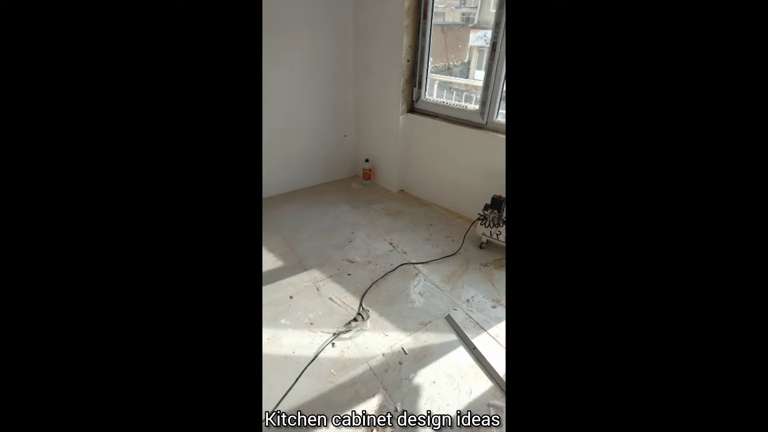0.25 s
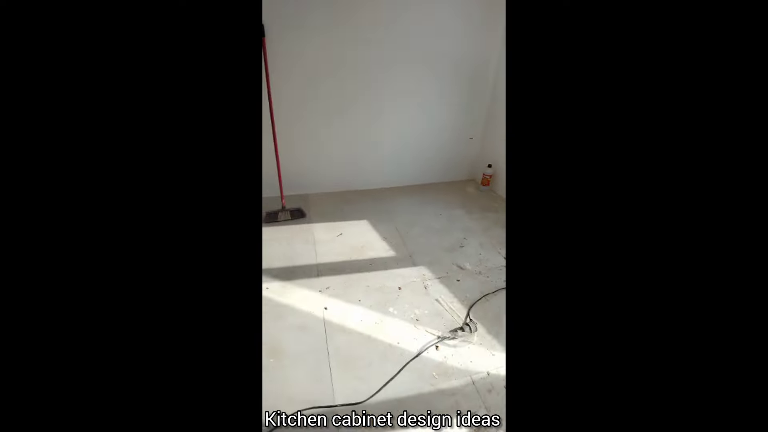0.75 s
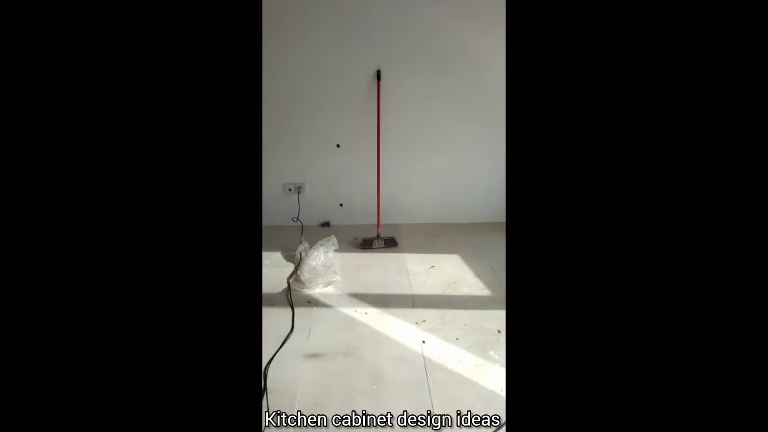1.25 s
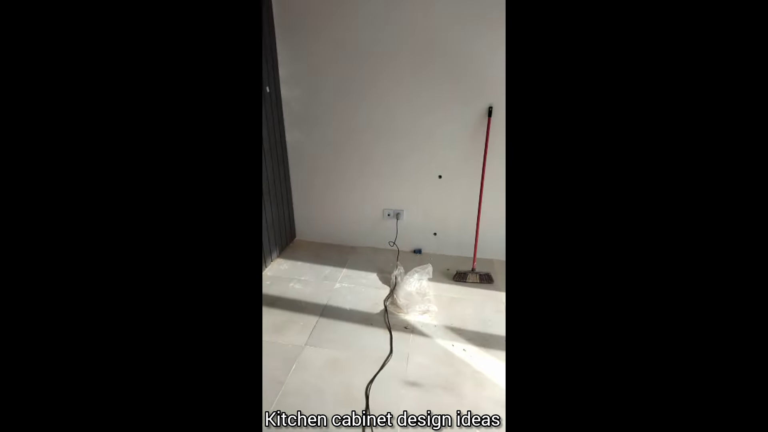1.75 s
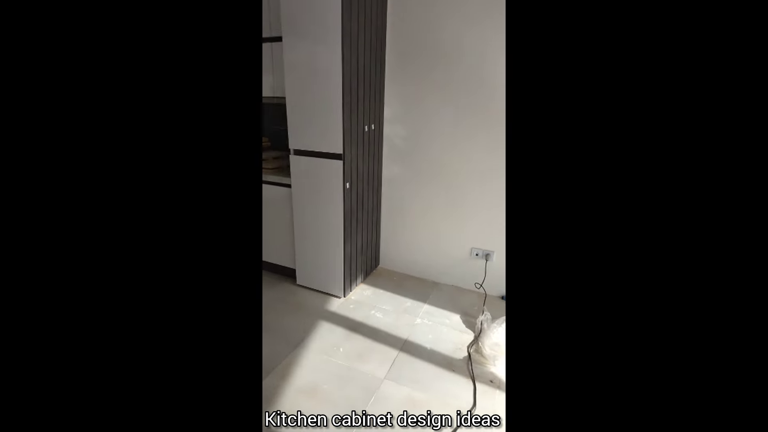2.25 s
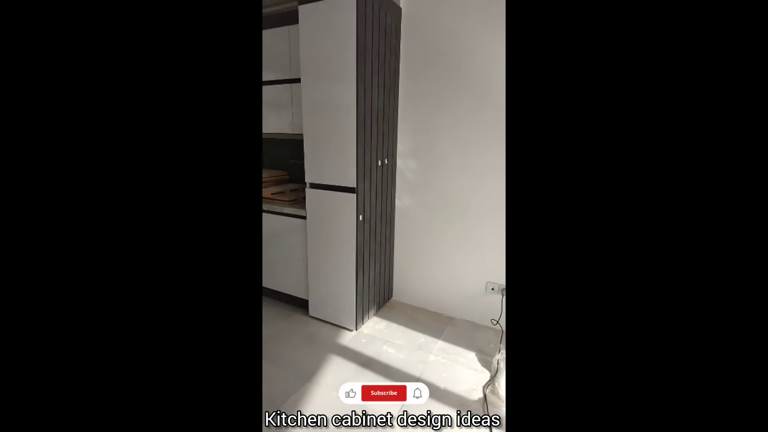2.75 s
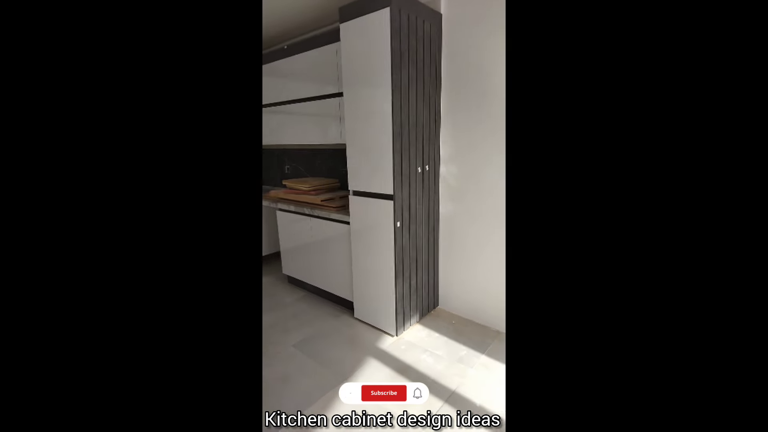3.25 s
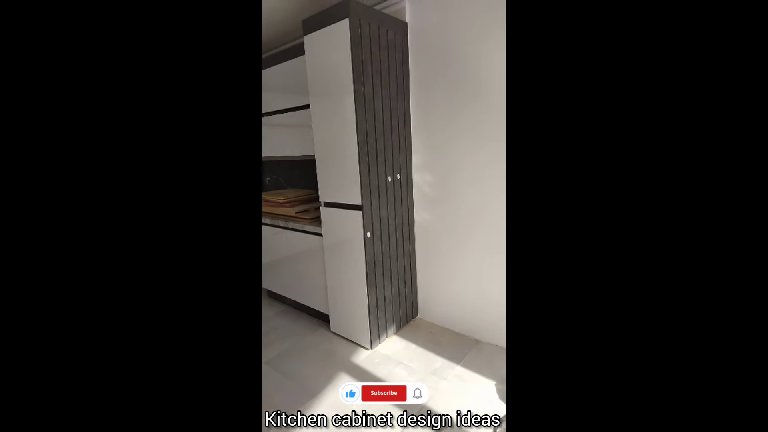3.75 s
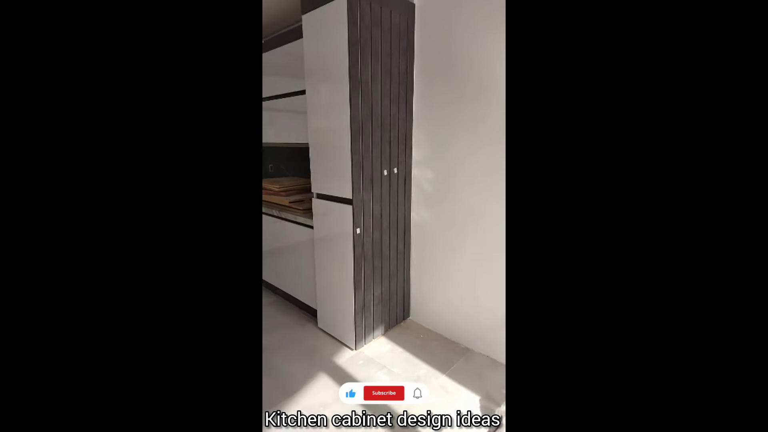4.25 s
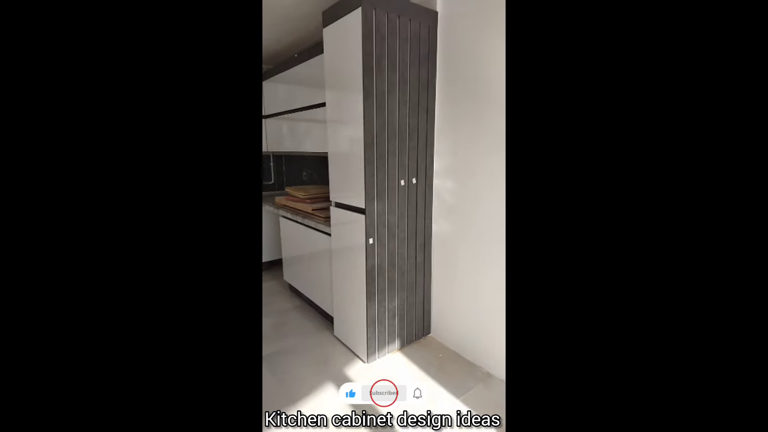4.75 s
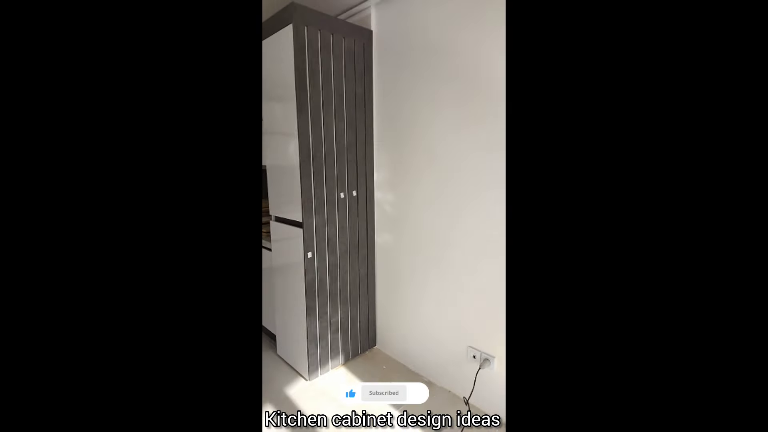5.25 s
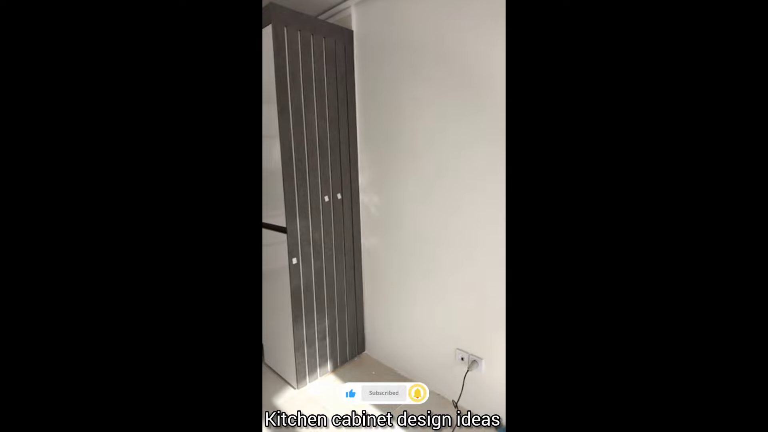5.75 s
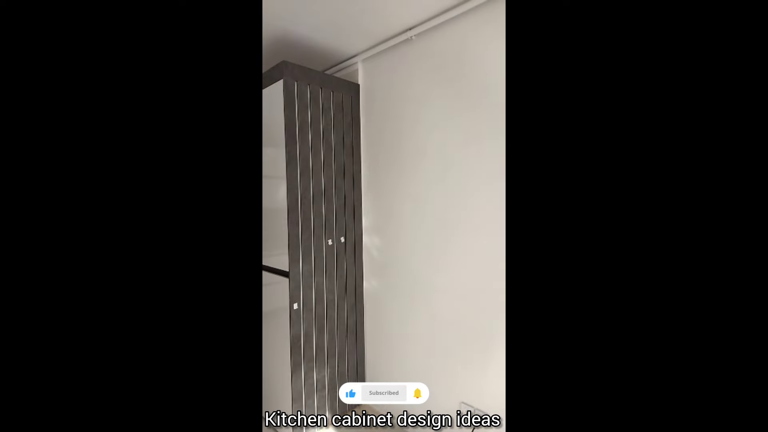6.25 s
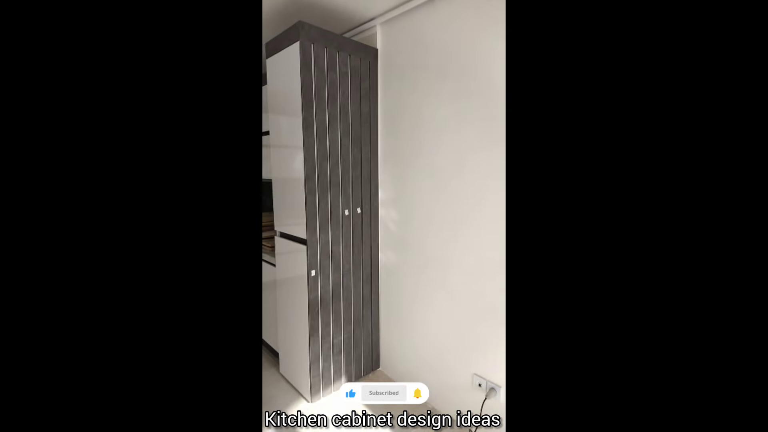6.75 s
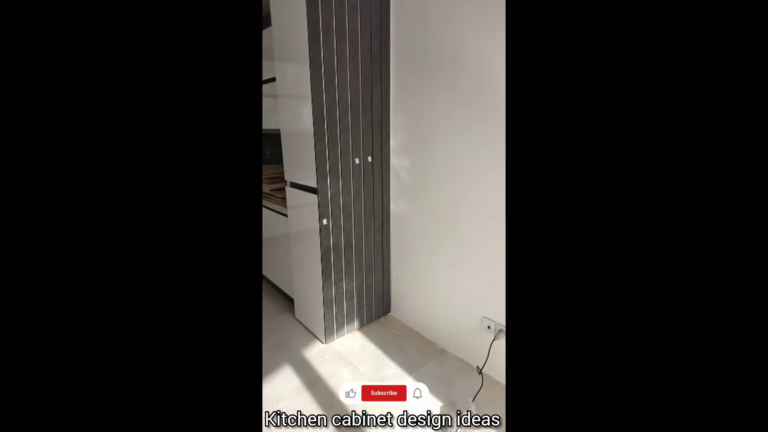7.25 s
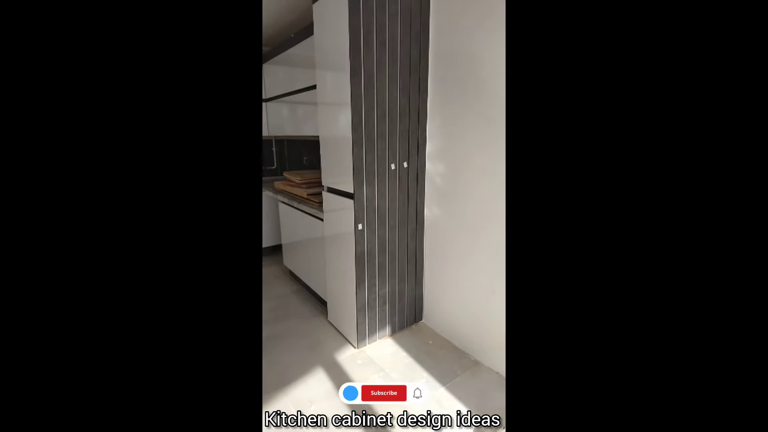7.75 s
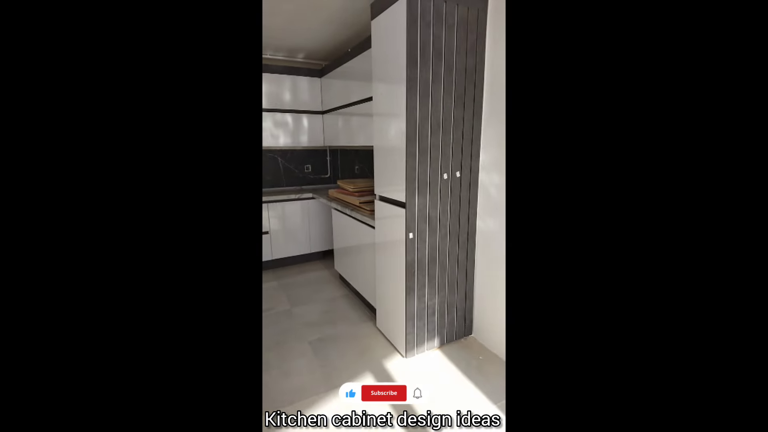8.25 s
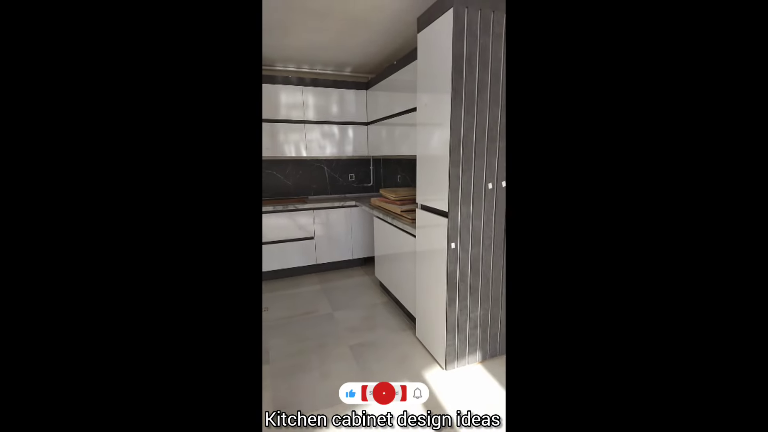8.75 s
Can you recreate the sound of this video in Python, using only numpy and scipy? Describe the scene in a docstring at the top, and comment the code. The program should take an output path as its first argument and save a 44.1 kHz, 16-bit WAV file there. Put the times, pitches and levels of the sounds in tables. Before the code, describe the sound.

An air blow gun spits rapid bursts, pauses, then spits again more softly, over a low buzzing compressor in a hard-walled empty room.

```python
"""Short blasts of a blow gun sweep dust in a bare tiled room: turbulent noise, shaped in frequency,
hisses at the nozzle and sounds duller where the jet strikes; decaying noise gives the room's answer.
A small twin-piston air compressor hums behind it: sine tones at multiples of its shaft speed, and noise
that pulses with the strokes. The phone turns and walks away from the pump, so the hum's tones
swell and fade in the room's standing waves."""
import sys
import numpy as np
from scipy import signal
from scipy.fft import rfft, irfft, next_fast_len
from scipy.io import wavfile
from scipy.ndimage import uniform_filter1d, map_coordinates

SR = 44100
rng = np.random.default_rng(int(sys.argv[2]) if len(sys.argv) > 2 else 0)


def dump(signal):
    """Clip the signal to [-1, 1] and save it as 16-bit WAV at the path in sys.argv[1]."""
    limited = np.clip(np.atleast_2d(signal).T, -1, 1)
    pcm = np.round(limited * 32767).astype(np.int16)
    wavfile.write(sys.argv[1], SR, pcm)


N = 397341
t = np.arange(N) / SR  # seconds


def blow_gun():
    """Jet turbulence: broadband noise, bright from the nozzle and duller where the jet strikes."""
    # Spectra of the nozzle hiss, the spray off the floor, the roar in corners and the low rush.
    # Each row: frequency in Hz, relative spectral density in dB per Hz.
    hiss_spectrum = [(3000, -24), (5500, -8.5), (7200, -7), (9000, -2), (11000, -6), (12000, -0.5),
                     (14000, -1), (15700, 1)]
    spray_spectrum = [(1300, -39.5), (2300, -3), (3500, 1), (4800, -1.5), (6300, -5), (9000, -15)]
    roar_spectrum = [(600, -26.5), (1100, -1), (1600, 0.5), (2200, 0.5), (3600, -15)]
    low_spectrum = [(120, -34), (300, -0.5), (600, -0.5), (900, 1), (1500, -36)]
    # Where the nozzle points. Each row: time in seconds, left-right level difference in dB.
    nozzle_aim = [(0, -1.5), (1.5, 8.5), (2.5, 3.5), (4.5, 6), (6.1, 6), (7.7, 8)]

    hiss_gain, spray_gain, roar_gain, low_gain = np.split(trigger(), [2, 3, 4])
    pan_db, = curves(nozzle_aim)
    pan_gain = amp([pan_db / 2, -pan_db / 2])
    flutter = amp(1.1 * wobble(18))
    hiss = hiss_gain * flutter * pan_gain * turbulence(hiss_spectrum, patchy_db=1.9)
    spray = spray_gain * flutter * turbulence(spray_spectrum, patchy_db=1.4)
    roar = roar_gain * turbulence(roar_spectrum, patchy_db=1.6)
    low_rush = low_gain * turbulence(low_spectrum, patchy_db=0.5)
    return hiss + spray + roar + low_rush


def trigger():
    """Valve envelopes: each pull opens, holds and decays exponentially; overlapping pulls add in power.

    Rows of the result: hiss left, hiss right, spray, roar, rush."""
    # Pulls of the trigger. Each row: start in seconds, opening time in seconds, held time in seconds,
    # nozzle hiss when open in dB, hiss at closing in dB, then at closing: spray off the floor in dB,
    # roar in corners in dB, low rush in dB; last the swell of these three in dB as the jet nears
    # a surface (negative: they sink).
    pulls = [(.389, 0.017, 0.25, -17, -21, -29.5, -36, -42.5, 10),
             (.64, 0.043, 0.16, -20, -20.5, -29, -27.5, -40, 5.5),
             (.878, 0.03, 0.095, -26, -21, -31, -31, -36.5, 12.5),
             (1.069, 0.031, 0.067, -33, -31.5, -45, -37.5, -43.5, -3),
             (1.19, 0.034, 0.092, -37, -30.5, -39, -35, -44, -0.5),
             (1.327, 0.041, 0.093, -28, -30, -29, -29.5, -42, 7.5),
             (1.53, 0.038, .12, -31, -30, -37, -37.5, -47, 2),
             (1.697, 0.067, 0.11, -21.5, -22, -27.5, -31.5, -41.5, 7.5),
             (2.012, 0.037, 0.15, -35, -20.5, -32.5, -34.5, -39, 12),
             (2.228, 0.048, 0.16, -22, -19, -23, -34.5, -48, 16.5),
             (2.45, .04, 0.19, -16.5, -24, -34.5, -40, -57, 4.5),
             (2.645, 0.022, 0.08, -25, -20.5, -29.5, -31.5, -45.5, 1.5),
             (2.805, 0.026, .12, -17.5, -19.5, -27.5, -36.5, -51, 3.5),
             (2.96, .05, 0.093, -21, -22, -29.5, -30.5, -41, 5),
             (3.325, 0.019, 0.13, -21.5, -18.5, -22.5, -31.5, -48, 9),
             (3.545, 0.027, 0.13, -21.5, -21.5, -33.5, -44, -54, 1.5),
             (3.818, 0.021, 0.14, -21.5, -23, -28, -35, -43, 0),
             (4.058, 0.02, 0.13, -26, -22.5, -26.5, -30.5, -41, 9.5),
             (6.012, 0.036, 0.11, -31.5, -25, -38, -39.5, -47, -1.5),
             (6.16, 0.048, .3, -29.5, -26, -37.5, -39, -40.5, 5.5),
             (6.58, 0.046, 0.12, -35, -27, -38.5, -44, -51, 6.5),
             (6.69, 0.024, 0.045, -28, -25, -31, -35, -50, 2),
             (6.83, .03, 0.26, -27.5, -33, -42.5, -48, -52, -9),
             (7.09, 0.037, 0.07, -35, -32, -42, -42.5, -48.5, -3),
             (7.325, 0.023, .12, -26, -24, -30.5, -32.5, -43.5, 2.1)]
    # Decay after closing. The columns: hiss, spray, roar and low rush, each in dB per second.
    fade_db_per_s = [178, 107, 91, 69]
    arch_db = 1  # extra level in mid-pull
    sweep_db = 2  # the nozzle swings from left to right in each pull: change of left-right difference

    power = np.zeros((5, N))
    for start, opening, held, open_db, close_db, spray_db, roar_db, rush_db, swell_db in pulls:
        first = round(start * SR)
        since = t[:min(SR, N - first)]
        done = np.clip(since / held, 0, 1)  # share of the held time gone by
        hiss_db = open_db + (close_db - open_db) * done
        struck_db = np.add.outer([spray_db, roar_db, rush_db], swell_db * (done - 1))
        level_db = np.vstack([hiss_db, struck_db]) + arch_db * np.sin(np.pi * done)
        level_db = level_db - np.outer(fade_db_per_s, np.maximum(since - held, 0))
        swing_db = sweep_db * (.5 - done) / 2
        level_db = np.vstack([level_db[0] + swing_db, level_db[0] - swing_db, level_db[1:]])
        rise = np.sin(np.pi / 2 * np.clip(since / opening, 0, 1)) ** 2
        power[:, first:first + len(since)] += (amp(level_db) * rise) ** 2
    return np.sqrt(power)


def turbulence(spectrum, patchy_db):
    """Partly coherent stereo noise with random time-frequency patches of gain; its mid has rms 1."""
    # Coherence of the two channels. Each row: frequency in Hz, left-right likeness from -1 to 1.
    likeness = [(60, 0.61), (180, 0.93), (550, 0.45), (1650, 0.0073), (4970, -0.011), (15000, 0.0012)]

    def mid_side_response(hz):
        # mid cos(angle) and side sin(angle) give a left-right correlation of cos(2 angle)
        angle = np.arccos(np.clip(along(likeness, hz), -1, 1)) / 2
        return amp(along(spectrum, hz)) * np.array([np.cos(angle), np.sin(angle)])

    cells = signal.stft(rng.standard_normal((2, N)), nperseg=512)[2]
    patches = rng.standard_normal(cells.shape[1:])
    patches = uniform_filter1d(patches, size=6, axis=0)  # over frequency
    patches = uniform_filter1d(patches, size=10, axis=1)  # over time
    pair = signal.istft(cells * amp(patchy_db * unit(patches)), nperseg=512)[1][:, :N]
    mid, side = filtered(pair, mid_side_response)
    return np.array([mid + side, mid - side]) / mid.std()


def walls(x):
    """Reverberation: convolution with noise in which each frequency decays at its own rate."""
    # Each row: frequency in Hz, reverberation time (60 dB of decay) in seconds.
    decay_times = [(500, 1.13), (2000, 1.22), (5000, 0.78), (10000, 0.59), (15000, 0.12)]
    hz, s, cells = signal.stft(rng.standard_normal((2, SR)), SR, nperseg=256)
    decay = amp(-60 * s / along(decay_times, hz)[:, None])
    tail = signal.istft(cells * decay, SR, nperseg=256)[1]
    tail = tail / np.linalg.norm(tail[0])
    delayed = np.pad(x, ((0, 0), (400, 0)))  # the room answers 400 samples (9 ms) later
    return signal.fftconvolve(delayed, tail, axes=1)[:, :N]


def pump():
    """Periodic machine: shaft harmonics, loosely phase-locked so the strokes chug, over pulsing noise."""
    # Harmonics of the shaft. Each row: multiple of the shaft speed, level in dB.
    shaft_orders = [(2, -73), (3, -70.5), (4, -64), (5, -62), (6, -48.5), (7, -54.5), (8, -62.5), (9, -41),
                    (10, -45), (11, -58), (12, -81), (13, -62), (14, -68), (15, -54.5), (16, -93),
                    (17, -52), (18, -69), (19, -62.5), (20, -78), (21, -73), (22, -77), (23, -82),
                    (24, -67.5), (25, -75.5), (26, -62.5), (27, -73), (28, -71.5), (29, -73), (30, -61.5),
                    (31, -70.5), (32, -77), (33, -63), (34, -71), (35, -58.5), (36, -65.5), (37, -63),
                    (38, -58), (39, -52), (40, -59), (41, -52.5), (42, -66), (43, -55.5), (44, -72),
                    (45, -73), (46, -66.5), (47, -78), (48, -71), (49, -75), (50, -78), (51, -78),
                    (52, -76), (53, -87), (54, -66)]
    # The walking phone crosses peaks and nodes of the standing waves. For each shaft order,
    # each row: time in seconds, width in seconds, change of level in dB.
    standing_waves = {6: [(0, 0.52, -15), (1.5, 0.55, -17), (2.9, 1.0, -22)], 9: [(.6, .3, -1.5),
                      (1.15, 0.25, -14), (3.75, 0.43, -8.5), (4.45, 0.27, -2.5)], 10: [(1.9, 0.27, 1),
                      (2.65, 0.63, -13), (4.6, 0.26, -15)], 7: [(1.8, 2.2, -4)], 11: [(2.8, 1.5, -8)],
                      13: [(3.6, 0.84, 6), (5, 0.48, 2)], 15: [(.6, 0.83, -16), (3.7, .4, 1)],
                      17: [(0, 0.42, 6.5), (1.5, 0.56, 6)], 26: [(7, 2.5, -12)], 30: [(.1, .3, 10)],
                      36: [(4.9, .4, -4), (8, 1.0, -7)], 39: [(.5, .15, -19), (3.6, 0.23, -7),
                      (4.45, 0.14, -22), (7, .4, -8)], 40: [(7.9, .9, 5.5)], 42: [(4.7, .4, -8),
                      (7.9, 1.3, -10)], 44: [(8.3, 2.5, -18)], 41: [(.4, 0.17, -20), (1.5, 0.26, 7.5),
                      (2.4, 0.99, 7.5), (5.9, 1.0, 4.5), (8.5, 0.52, -4.5)], 43: [(1, .3, -18),
                      (2.1, .2, -5), (3.9, .5, -7), (4.75, .2, -14), (8.1, 0.34, -3), (9, 0.22, -6)]}
    # Mains hum and other tones of steady pitch. Each row: frequency in Hz, level in dB.
    hums = [(88, -72), (100, -61), (104, -72), (132, -55), (200, -68), (244, -64)]
    # Two even knocks a turn, later one leads.
    # Each row: time in seconds, extra lag of the even knock orders in radians.
    both_heads = [(0, 1.4), (6.9, 1.4), (7.6, 0), (9.01, 0)]
    # Spectra of the reed valves with cooling fans, and of the casing rumble between the tones.
    # Each row: frequency in Hz, relative spectral density in dB per Hz.
    valve_spectrum = [(650, -34), (1100, -1), (1200, -14), (1420, -3), (1540, -3.5), (2340, -2),
                      (2560, -1.5), (3660, -6.5), (4370, 0), (5160, -10), (6590, -7), (7970, -13.5),
                      (9310, -7.5), (10300, -15.5), (15700, -17)]
    casing_spectrum = [(20, -45), (60, -21), (90, -4), (130, -2.5), (220, 2.5), (400, -3.5), (550, -6.5),
                       (720, -5), (950, -4), (1200, -8), (1800, -32)]
    # Each row: time in seconds, valve noise level in dB, casing noise level in dB.
    noise_levels = [(0, -44.5, -46), (.35, -44.5, -38), (.47, -45, -52), (.8, -42, -49), (4.5, -46, -46.5),
                    (6, -45, -51), (9.01, -45.5, -51)]
    shaft_hz = 24.012

    shaft = 2 * np.pi * shaft_hz * (t - .009)  # shaft angle in radians
    tones = sum(tone(2 * np.pi * hz * t, db + 4.2 * wobble(1.57), hz) for hz, db in hums)
    even_lag, = curves(both_heads)
    for k, db in shaft_orders:
        # strong orders meet the standing waves at set moments, weak ones drift at random
        bumps = [change_db * np.exp(-((t - s) / width) ** 2)
                 for s, width, change_db in standing_waves.get(k, [])]
        level_db = db + (sum(bumps) if bumps else 1.9 * wobble(1.47))
        # delay in radians of shaft turn, scatter in radians of the tone's own phase
        if k < 18:
            delay, scatter = .57, .6  # the thump
        elif k > 32:
            delay, scatter = 1.8, .4  # a knock near 1 kHz, just after the thump
        else:
            delay, scatter = 0, 3  # out of step
        lag = delay * k + rng.normal(0, scatter) + .2 * wobble(.6) + .1 * wobble(20)
        if k > 32 and k % 2 == 0:
            lag = lag + even_lag
        tones += tone(k * shaft - lag, level_db, k * shaft_hz)

    valves_db, casing_db = curves(noise_levels)
    puffs = unit(amp(.5 * np.cos(2 * shaft)))  # two heads, two puffs a turn
    strokes = unit(amp(0.84 * np.cos(shaft) + 1.0 * np.cos(2 * shaft)))
    top_cut = [(17000, -120)]
    valves = amp(valves_db) * puffs * turbulence(valve_spectrum + top_cut, patchy_db=1.0)
    casing = amp(casing_db) * strokes * turbulence(casing_spectrum, patchy_db=1.5)
    return tones + valves + casing


def tone(turn, db, hz):
    """Interference at two ports: a sine of phase turn, plus a drifting sine of opposite sign in each."""
    # Each row: frequency in Hz, typical level of side against mid in dB.
    side_levels = [(60, -16), (250, -15), (420, -12), (700, 0), (1300, -5.5)]
    size = np.sqrt(2) * amp(db + 0.78 * wobble(12))  # peak from rms
    drift = rng.uniform(0, 2 * np.pi) + 1.45 * wobble(0.734)
    side = amp(along(side_levels, hz) + 5.2 * wobble(1)) * np.sin(turn + drift)
    return size * np.array([np.sin(turn) + side, np.sin(turn) - side])


def port_response(hz):
    """Direction-dependent sensitivity: the two microphone ports take the pump at unequal levels."""
    # Each row: frequency in Hz, left-right level difference in dB.
    port_lean = [(60, 4), (180, -0.5), (550, 0.5), (1650, 1), (4970, 2.5), (15000, 7)]
    lean_db = along(port_lean, hz)
    return amp([lean_db / 2, -lean_db / 2])


def amp(db):
    """Level to amplitude: 20 dB for each factor of ten."""
    return 10 ** (np.asarray(db) / 20)


def unit(x):
    """Normalization by the root mean square, to rms 1."""
    return x / np.sqrt(np.mean(x ** 2) + 1e-20)


def along(points, hz):
    """Interpolation of (Hz, value) points on a logarithmic frequency axis."""
    f, v = np.transpose(points)
    return np.interp(np.log(hz + 1), np.log(f + 1), v)


def curves(rows):
    """Linear interpolation in time: one value per sample for each column after the time."""
    s, *cols = np.transpose(rows)
    return [np.interp(t, s, c) for c in cols]


def wobble(rate):
    """Slow random modulation: straight lines between normal random knots, rate knots a second."""
    return map_coordinates(rng.standard_normal(int(N * rate / SR) + 4), [t * rate], order=1)


def filtered(x, response):
    """Linear filtering: the spectrum of x times a response that is a function of frequency in Hz."""
    m = next_fast_len(N + SR // 2)
    return irfft(rfft(x, m) * response(np.fft.rfftfreq(m, 1 / SR)), m)[..., :N]


def scene():
    """Superposition: the near gun, the room's answer to it 8 dB down, and the pump that fills the room."""
    air = blow_gun()
    hum = filtered(pump(), port_response)
    return air + amp(-8.0) * walls(air) + hum


def record(dry):
    """Band limitation: the phone keeps nothing from 15750 Hz up."""
    top_hz = 15750
    return filtered(dry, lambda hz: hz < top_hz)


dry = scene()
out = record(dry)
dump(out)
```